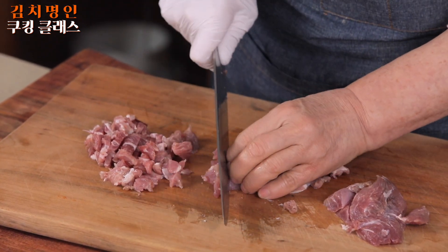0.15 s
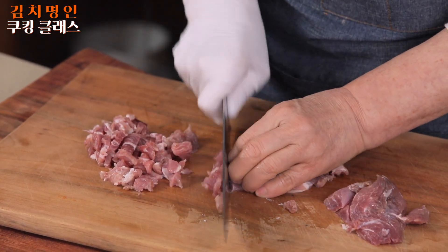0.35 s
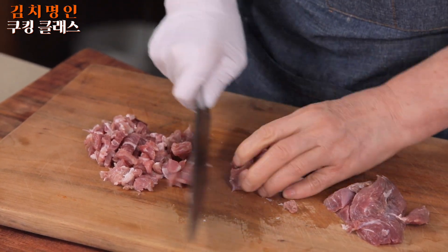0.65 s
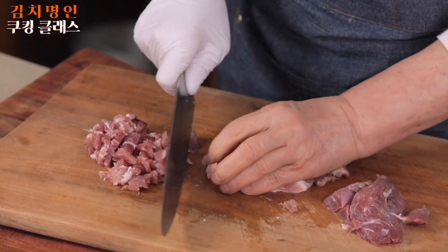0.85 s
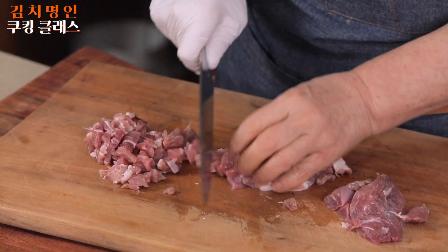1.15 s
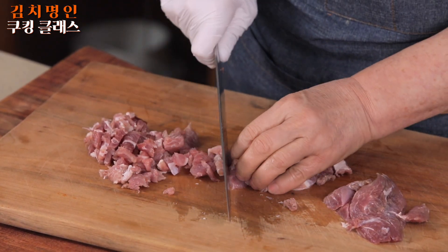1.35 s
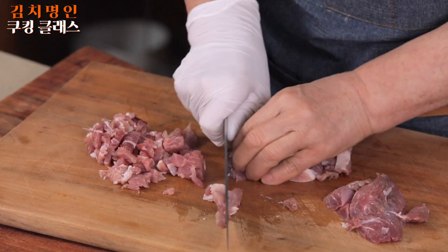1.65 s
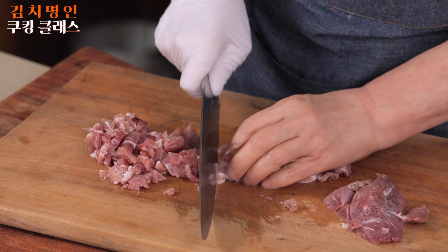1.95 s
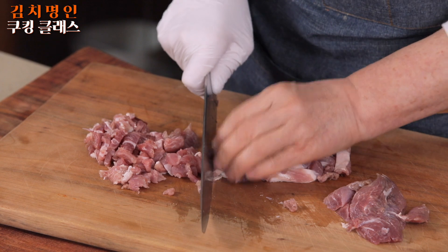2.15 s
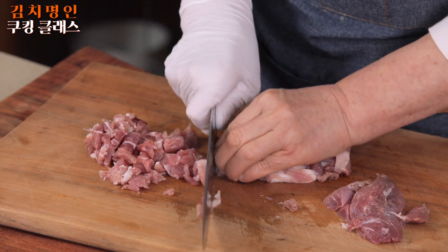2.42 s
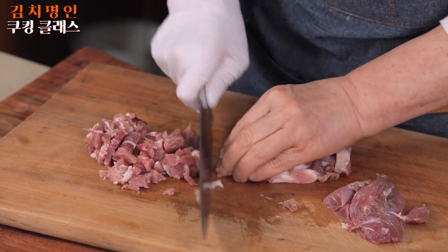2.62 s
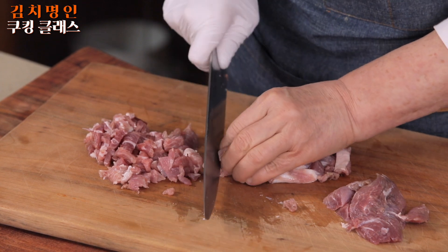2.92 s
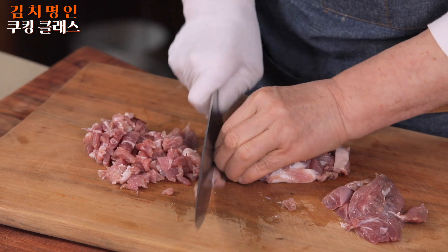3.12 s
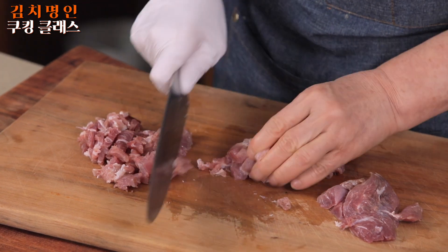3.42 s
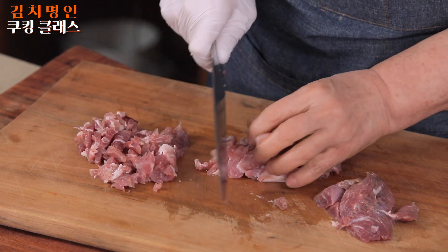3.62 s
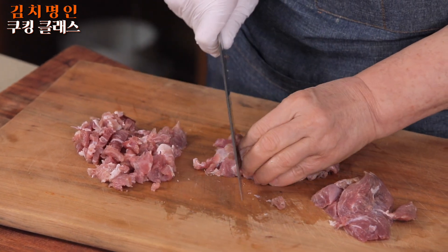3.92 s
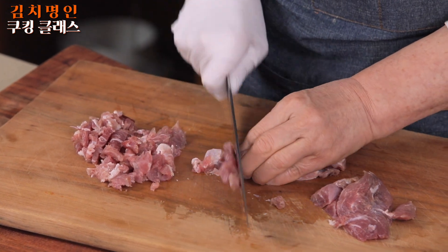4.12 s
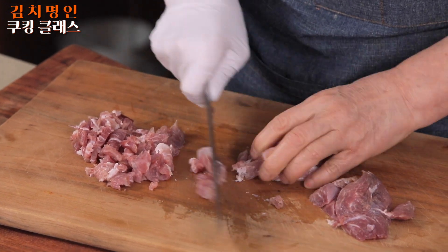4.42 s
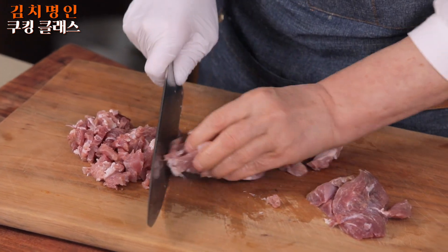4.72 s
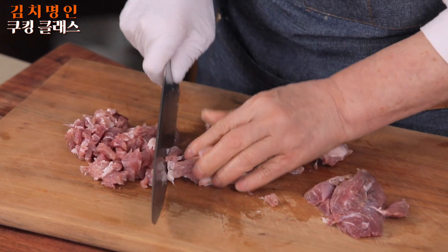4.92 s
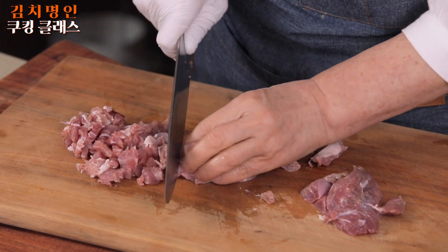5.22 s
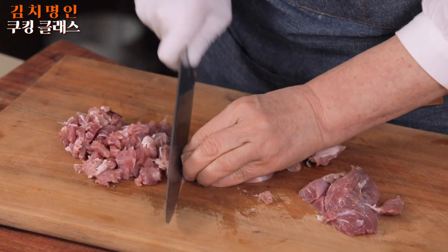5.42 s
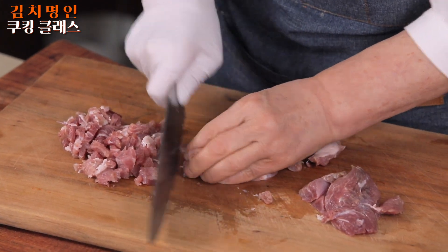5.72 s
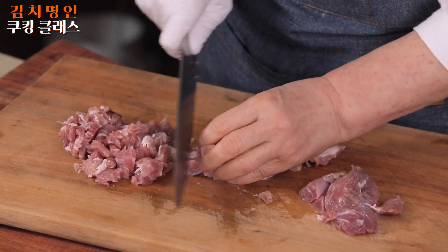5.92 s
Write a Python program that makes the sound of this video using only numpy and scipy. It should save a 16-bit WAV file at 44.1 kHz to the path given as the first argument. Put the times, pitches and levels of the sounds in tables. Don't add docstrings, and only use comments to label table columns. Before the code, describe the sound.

A quiet kitchen with a low, steady fan hum, heard close and almost mono. At 0.1-0.2 s small wet meat ticks, then at 0.28 a damped wooden knock leads into a longer rubbing slide, followed by a blade sweep around 0.6. A clear, duller knock comes at 1.0, a softer one at 1.45, and a loud hollow chop with thump at 1.63. A faint push fades near 1.9. At 2.4 a cut is mostly a soft slide with little knock, then a stronger scraping sweep at 2.55. A crisp chop with steel clicks lands at 3.16, with a bright flick at 3.33. After a pause, a light cut at 4.08 precedes the loudest hollow blow at 4.25; wet pops and a long sweep follow at 4.4-4.6. A last knock and gritty slide come at 5.48, a short push at 5.73, and tiny bright clicks at 6.0.

```python
import sys
import numpy as np
from scipy import signal
from scipy.fft import rfft, irfft
from scipy.io import wavfile
from scipy.ndimage import uniform_filter1d

SR = 44100
rng = np.random.default_rng(int(sys.argv[2]) if len(sys.argv) > 2 else 0)


def undo_db(level):
    steps = np.asarray(level, float) / 20
    return 10 ** steps


def int16_out(signal):
    q = np.round(np.clip(np.atleast_2d(signal).T, -1, 1) * 32767)
    wavfile.write(sys.argv[1], SR, q.astype(np.int16))


N = 267246

# frequency [Hz], density [dB per Hz].
KITCHEN_AIR = [(12, -58), (20, -22), (91, -10.5), (222, -15.5), (337, -9), (367, -8), (607, -16),
               (698, -16.5), (759, -10), (1330, -13), (1860, -23.5), (14700, -26.5), (16000, -24)]
# frequency [Hz], level [dB].
FAN_LINES = [(699.8, -71.5), (1007, -76), (1357, -78), (2126, -86.5)]
# frequency [Hz], density [dB per Hz].
MIC_HISS = [(20, -9), (180, -2.5), (2000, -7.5), (15500, -9), (17000, -14)]
# band centre [Hz], decay by 60 dB [s], level [dB].
ROOM_BANDS = [(286, 0.4, -20.5), (1020, 0.75, -29.5), (2300, 0.27, -14.5), (7250, 0.25, -10.5)]
# frequency [Hz], level [dB], decay by 60 dB [s].
WORKTOP_MODES = [(40.5, -5.5, 0.083), (68.7, -2.5, 0.2), (92, -7, 0.027), (164.8, -16.5, 0.34),
                 (235.3, -15, 0.21)]
# time of most weight [s], level [dB], letting go [dB per s].
LEANS = [(.29, -62, 70), (.36, -59, 60), (.425, -45.5, 218), (.5, -58, 90), (.56, -67, 64), (.66, -63, 106),
         (.995, -54.5, 78), (1.648, -38.5, 126), (1.89, -62, 73), (2.41, -55, 90), (2.55, -49.5, 120),
         (3.178, -43.5, 114), (3.34, -53.5, 142), (4.1, -63, 36), (4.265, -41.5, 97), (5.49, -58, 57),
         (5.75, -66, 99)]
# start [s], peak [dB],
# pitch [Hz], spread [share of pitch].
POPS_AND_TICKS = [(0.0623, -40, 5600, 0.82), (0.1164, -45, 2540, 0.97), (0.162, -39.5, 5750, 0.93),
                  (0.263, -39.5, 3140, 0.32), (0.567, -37.5, 3580, 0.71), (0.794, -37.5, 3020, 0.85),
                  (0.8132, -37, 2360, 0.74), (1.4671, -41, 2520, 0.6), (1.54, -36, 3000, 0.83),
                  (1.879, -44, 2370, 0.52), (2.291, -39.5, 5330, 0.44), (2.3196, -42, 3050, 0.91),
                  (4.0133, -43, 2920, 0.97), (4.4752, -34, 2470, 0.6), (4.499, -31, 3090, 0.28),
                  (5.403, -50, 3040, 0.69), (5.435, -50, 5690, 0.6), (6.0095, -40, 5500, 0.44),
                  (0.1422, -39, 14100, 0.61), (0.179, -34, 8000, 1.1), (0.2508, -41, 14100, 0.43),
             (0.2835, -27.5, 14100, 0.39), (1.0281, -44, 11200, 0.61), (1.5668, -38, 12400, 0.71),
             (1.6304, -33.5, 5900, 0.3), (2.228, -37, 14200, 0.77), (2.272, -53, 6100, 0.56),
             (2.32, -38, 14800, 0.74), (2.339, -38, 14600, 0.51), (2.6698, -50, 6250, 0.69),
             (3.055, -32.5, 6000, 0.36), (3.1573, -29, 5800, 0.54), (3.339, -29, 6560, 0.71),
             (4.3335, -44, 8600, 0.55), (4.4119, -36, 6060, 0.35), (5.3282, -40, 11500, 0.78),
             (5.3612, -47, 11300, 0.55), (5.4296, -54, 6290, 0.55), (6.0137, -39, 6340, 0.71),
                  (3.055, -33.5, 12900, 0.86),
    (3.158, -29, 10800, 0.93),
    (3.3373, -34, 13400, 0.93),
    (6.012, -35, 11100, 1),
    (6.017, -44.5, 3800, .4),
    (6.022, -45, 12000, .8),
]
# start [s], length [s], start pitch [Hz], end pitch [Hz], level [dB].
GRAIN_NOTES = [(0.29, 0.055, 1700, 1800, -43), (0.385, 0.115, 684, 735, -41), (.61, 0.065, 990, 920, -51),
               (0.65, 0.056, 3500, 4000, -52), (2.39, 0.11, 4300, 4250, -56),
               (2.665, 0.042, 6100, 6100, -62), (3.163, 0.053, 5600, 6700, -51.5),
               (3.33, .03, 13000, 15000, -50), (3.165, .08, 690, 720, -43), (5.59, .07, 800, 960, -47),
               (2.415, .07, 730, 720, -46), (1.485, .045, 1700, 1700, -51), (5.564, 0.097, 640, 800, -47),
               (1.926, 0.056, 2400, 2450, -58), (.325, .08, 2400, 2400, -46.5),
               (.665, .07, 2300, 2450, -52), (.66, 0.071, 6100, 4900, -54.5), (5.485, .06, 2600, 2400, -47),
               (5.55, 0.064, 3100, 2800, -48.5)]
# landing [s], length [s], level [dB], brightness [dB].
ENTRIES_INTO_MEAT = [(0.294, 0.1, -48, 4), (1.636, 0.032, -46, 13), (2.367, 0.2, -59.5, 10),
                     (3.132, 0.059, -44.5, -9), (3.152, 0.062, -54.5, 20), (4.078, 0.27, -59, 10),
                     (4.236, .16, -68, 22), (4.245, 0.08, -63, 17), (1.61, 0.28, -73, 30),
                     (5.454, 0.096, -71, 37), (5.483, 0.049, -38, 9)]
# start [s], hold [s], release [s], level [dB], brightness [dB].
FORWARD_CUTS = [
    (.297, 0.13, .07, -46, 3),
    (1.008, .005, .12, -47, -24),
    (1.478, 0.021, 0.083, -49, -1),
    (1.643, 0.0025, .12, -39.5, -7),
    (2.388, 0.062, 0.075, -43, -3),
    (3.166, 0.0057, .12, -40.5, -4),
    (4.085, 0.041, 0.1, -50.5, 7.5),
    (4.275, 0.019, 0.12, -40, -15.5),
    (5.487, 0.071, 0.11, -43.5, 3),
]
# start [s], hold [s], release [s], level [dB], brightness [dB].
SIDE_SWEEPS = [
    (.575, 0.12, 0.078, -57, -2.5),
    (.62, 0.089, 0.038, -59, 13.5),
    (1.875, .04, 0.17, -55.5, -1),
    (2.55, 0.097, 0.091, -50.5, -5),
    (2.655, 0.026, 0.021, -79.5, 22.5),
    (2.885, 0.0058, 0.03, -78, 14.5),
    (3.33, 0.0023, 0.032, -54.5, 9.5),
    (4.415, 0.091, 0.13, -51, 2),
    (5.728, 0.022, 0.054, -55, 1.5),
]
# offset [dB], share of brightness [ratio], first touch [dB], swell over the hold [dB], silence [dB].
ENTRY_ANSWER = [(0.5, 0.066, 0, 0, -78), (-1.5, 0.088, 0, 0, -90), (-6.5, 0.23, 0, 0, -83.5),
                (-12.5, 0.89, 0, 0, -78.5)]
CUT_ANSWER = [(-2, 0.19, 1.5, -0.5, -68.5), (-0.5, 0.78, 0, 0, -75), (-7.5, 1.11, -6.5, -6, -74.5),
              (-14, 0.84, -9.5, -6.5, -78)]
SWEEP_ANSWER = [(-0.5, 0, -3, -0.5, -71.5), (1.5, 0.17, -8, -2, -70.5), (-3, 0.65, -13.5, -3, -80),
                (-3, 1.3, -8, 0.5, -80)]
# frequency [Hz], width [Hz], level [dB].
RUBBED_LOW = [(245, 210, -20), (365, 40, -13.5), (471.6, 27, -8.5), (563, 36.6, 3), (652, 23, -3),
              (770, 84, -19)]
RUBBED_UPPER = [(954, 29, -6.5), (1074, 37, -4.5), (1225, 89, -5.5), (1427, 72, -6), (1711, 77, -5.5)]
RUBBED_FINE = [(2080, 220, -0.5), (2393, 190, 5.5), (2770, 110, -20), (3024, 250, 2), (3350, 160, -0.5),
               (3800, 230, -6), (4230, 1700, -9.5)]
RUBBED_HISS = [(5120, 850, -2), (5340, 2500, 12), (6900, 260, 5), (8760, 5100, 2.5), (12300, 3300, 6.5),
               (13800, 8500, 2.5)]
BLADE_STEEL = [(5600, 330, -26), (5380, 370, 1), (6160, 200, 5.5), (6570, 630, 2.5), (7340, 390, -7),
               (8680, 860, -3.5), (9560, 110, 4.5), (10800, 590, -1.5), (12100, 300, 6), (13200, 450, -27),
               (14100, 600, -2), (14400, 2300, 0)]
# frequency [Hz], level [dB], decay by 60 dB [s].
BOARD_MODES = [(198, -22.5, 0.1), (278, -14.5, 0.042), (364, -24.5, 0.095), (430.3, -9, 0.099),
               (527.7, -10.5, 0.11), (555.4, -2.5, 0.11), (584.6, 1.5, 0.078), (730, -46, 0.028),
               (920, -23, 0.04), (1104, -9.5, 0.048), (1190, -1, 0.016), (1345, -21, 0.044),
               (1627, -20.5, 0.042), (1755, 3.5, 0.063), (1910, 0.5, 0.066), (2196, 0.5, 0.07),
               (2370, 6.5, 0.029), (2645, 11.5, 0.026), (3050, -1.5, 0.056), (3760, -10.5, 0.029)]
# time [s], peak [dB], upper modes [dB], fine modes [dB],
# ringing [0-1, low where meat and hand damp the wood].
EDGE_KNOCKS = [(0.264, -34.5, -3, -12, 0.3), (0.284, -17.5, 0.5, -28, 0.36), (0.995, -16.5, 2.5, -35, 0.87),
               (1.162, -41.5, 8, -14, 0.09), (1.454, -23, -12.5, -27, 0.88),
               (1.6311, -13, -7.5, -13.5, 0.69), (2.319, -43, -9, -6, 1), (2.386, -53, -21, -17, 0.7),
               (3.053, -42.5, -8, -6.5, 0.76), (3.16, -21.5, -6, -10, 0.5), (3.325, -43.5, -6, -24, 0.5),
               (4.053, -34, -8, -23, 0.04), (4.076, -28, -6.5, -9, 0.57), (4.2494, -11, 2, -14.5, 0.57),
               (4.415, -32.5, -12, -12, 0.63), (5.477, -18.5, -4.5, -12.5, 0.78)]


def level(x, db=0):
    return x * undo_db(db) / np.sqrt(np.mean(x ** 2))


def fade(t, t60):
    return np.exp(-np.log(1000) * t / t60)


def add(out, s, x):
    i = int(s * SR)
    out[i:i + len(x)] += x[:N - i]


def flutter(db, count):
    return np.interp(np.linspace(0, count - 1, N), np.arange(count), undo_db(db * rng.standard_normal(count)))


def coloured(spectrum):
    hz, db = np.transpose(spectrum)
    f = np.maximum(np.fft.rfftfreq(N, 1 / SR), 1)
    gain = undo_db(np.interp(np.log(f), np.log(hz), db))
    return level(irfft(rfft(rng.standard_normal(N)) * gain, N))


def resonate(x, peaks):
    out = 0
    for k, (hz, width, db) in enumerate(peaks):
        b, a = signal.iirpeak(hz, hz / width, fs=SR)
        out = out + (-1) ** k * undo_db(db) * signal.lfilter(b, a, x)
    return out


def rubbed(body, slips, patchy_db):
    x = 0
    for hz, width, db in body:
        contact = flutter(patchy_db, count=150) * flutter(2.5, count=900)
        force = rng.standard_normal(N) * slips * contact
        narrow = resonate(force, [(hz, width, db)])
        x = x + resonate(narrow, [(hz, min(11.6 * width, hz), 0)])
    return x / np.sqrt(uniform_filter1d(x ** 2, size=3500))


def ring(modes, scatter_db, rise, ringing):
    t = np.arange(SR // 2) / SR
    hz, db, t60 = np.transpose(modes)[:, :, None]
    loudness, tuning, phase = rng.standard_normal((3, len(modes), 1))
    envelope = undo_db(db + scatter_db * loudness) * fade(t, ringing * t60)
    x = envelope * np.sin(2 * np.pi * hz * (1 + 0.0029 * tuning) * t + 1.1 * phase)
    x = -x.sum(axis=0) * (1 - np.exp(-t / rise)) ** 2
    return x / np.abs(x).max()


def kitchen():
    t = np.arange(N) / SR
    lines = 0
    for hz, db in FAN_LINES:
        drift = 4.66 * flutter(2.0, count=40)
        tone = np.sin(2 * np.pi * hz * t + drift)
        lines = lines + np.sqrt(2) * undo_db(db) * flutter(0.97, count=30) * tone
    return level(coloured(KITCHEN_AIR), -62) * flutter(0.32, count=12) + lines


def room(x):
    t = np.arange(SR // 2) / SR
    tail = 0
    for hz, t60, db in ROOM_BANDS:
        band = resonate(rng.standard_normal(len(t)), [(hz, 1.8 * hz, 0)])
        tail = tail + level(band * fade(t, t60), db)
    tail = tail * np.clip(t / 0.011, 0, 1) / np.sqrt(len(t))
    return signal.fftconvolve(x, tail)[:N]


def lean():
    t = np.arange(N) / SR
    rise_db_s, rest_db = 696, -81
    weight = undo_db(rest_db)
    for s, db, fall_db_s in LEANS:
        weight = weight + undo_db(db + np.minimum((t - s) * rise_db_s, (s - t) * fall_db_s))
    return weight


def worktop():
    body = [(hz, 14, db) for hz, db, t60 in WORKTOP_MODES]
    return lean() * rubbed(body, 1, 6)


def ticks():
    out, t = np.zeros(N), np.arange(SR // 100) / SR
    for s, db, hz, spread in POPS_AND_TICKS:
        band = [(hz, spread * hz, 0)]
        puff = rng.standard_normal(len(t)) * fade(t, 0.0051)
        pop = resonate(resonate(puff, band), band)
        add(out, s, undo_db(db - 4) * pop / np.abs(pop).max())
    return out


def singing():
    out = np.zeros(N)
    for s, length, start_hz, end_hz, db in GRAIN_NOTES:
        noise = rng.standard_normal((2, SR // 5))
        n = int(length * SR)
        phase = 2 * np.pi * np.cumsum(np.linspace(start_hz, end_hz, n)) / SR
        wobble = uniform_filter1d(noise, size=max(int(14 * SR / start_hz), 1))[:, :n]
        band = wobble[0] * np.cos(phase) + wobble[1] * np.sin(phase)
        add(out, s, level(band, db) * np.hanning(n) ** 0.5)
    return out


def entries():
    offset, share, touch, swell, silence = np.transpose(ENTRY_ANSWER)
    for s, length, db, bright in ENTRIES_INTO_MEAT:
        yield np.column_stack([[s - length, s + 0.0049], [silence, db + offset + share * bright]])


def shapes(strokes, answer, attack, build):
    offset, share, touch, swell, silence = np.transpose(answer)
    for s, hold, release, db, bright in strokes:
        top = db + offset + share * bright
        early = top - swell - share * bright * min(build * hold, 1)
        times = s + np.cumsum([0, attack, max(hold, 0.001), release])
        yield np.column_stack([times, [early + touch, early, top, np.minimum(silence, top)]])


def pressure(strokes):
    t, gains = np.arange(N) / SR, np.zeros((4, N))
    bite, lift = 0.008, 0.008
    for rows in strokes:
        s, *columns = np.transpose(rows)
        on = slice(max(int((s[0] - bite) * SR), 0), min(int(s[-1] * SR), N))
        edge = np.clip(np.minimum((t[on] - s[0]) / bite + 1, (s[-1] - t[on]) / lift), 0, 1)
        gains[:, on] += edge * undo_db(np.array([np.interp(t[on], s, db) for db in columns]))
    return gains


def rubbing():
    cut = pressure(entries()) + pressure(shapes(FORWARD_CUTS, CUT_ANSWER, attack=0.029, build=0))
    sweep = pressure(shapes(SIDE_SWEEPS, SWEEP_ANSWER, attack=0.02, build=4.8))
    slips = flutter(2, count=2500) * flutter(1.2, count=500)
    wood = 0
    for k, body in enumerate((RUBBED_LOW, RUBBED_UPPER, RUBBED_FINE)):
        wood = wood + (cut[k] + sweep[k]) * rubbed(body, slips, 4.8)
    hiss = cut[3] * rubbed(RUBBED_HISS, np.sqrt(slips), 1.1)
    steel = sweep[3] * rubbed(BLADE_STEEL, slips, 3)
    return wood + hiss + steel


def knocks():
    out, t = np.zeros(N), np.arange(SR // 20) / SR
    weight = lean()
    thump_db, thump_lag_s = 7, 0.026
    low, upper, fine = BOARD_MODES[:8], BOARD_MODES[8:13], BOARD_MODES[13:]
    for s, db, upper_db, fine_db, ringing in EDGE_KNOCKS:
        wood = ring(low, 4.1, 0.00041, ringing)
        wood = wood + undo_db(upper_db) * ring(upper, 0.28, 0.00071, ringing)
        wood = wood + undo_db(fine_db) * ring(fine, 1.0, 0.0027, ringing)
        push = undo_db(thump_db) * weight[int((s + thump_lag_s) * SR)]
        thump = push * ring(WORKTOP_MODES, 1.8, 0.0018, 0.34)
        add(out, s + 0.000915, undo_db(db - 2.5) * wood + thump)
        grain = level(resonate(rng.standard_normal(len(t)), [(3280, 1300, 0)]))
        crack = fade(t, 0.082) * np.clip(t / 0.00046, 0, 1) * grain
        add(out, s + 0.00058, undo_db(db + fine_db - 16.5) * crack)
    return out


def scene():
    close = knocks() + ticks() + rubbing() + singing()
    mid = close + room(close) + worktop() + kitchen()
    side = level(coloured(MIC_HISS), -68)
    return np.array([mid + side, mid - side])


def band_limit(x):
    return signal.sosfilt(signal.butter(12, 16480, fs=SR, output="sos"), x)


def record(dry):
    top_cut = signal.ellip(10, 0.2, 60, 15800, fs=SR, output="sos")
    mix = signal.sosfilt(top_cut, dry)
    return band_limit(mix)


dry = scene()
out = record(dry)
int16_out(out)
```